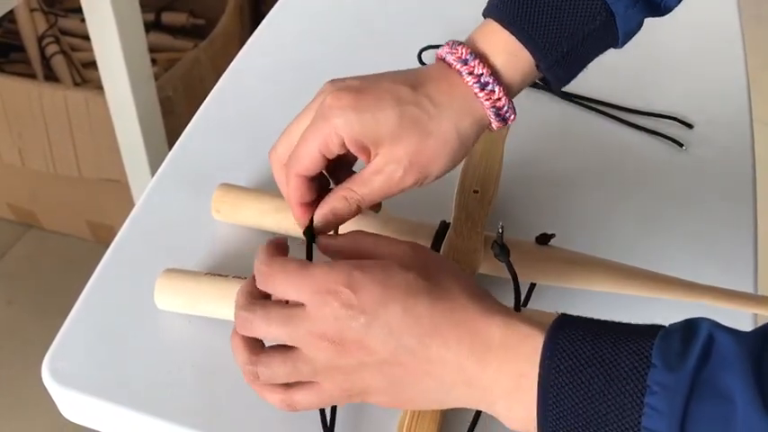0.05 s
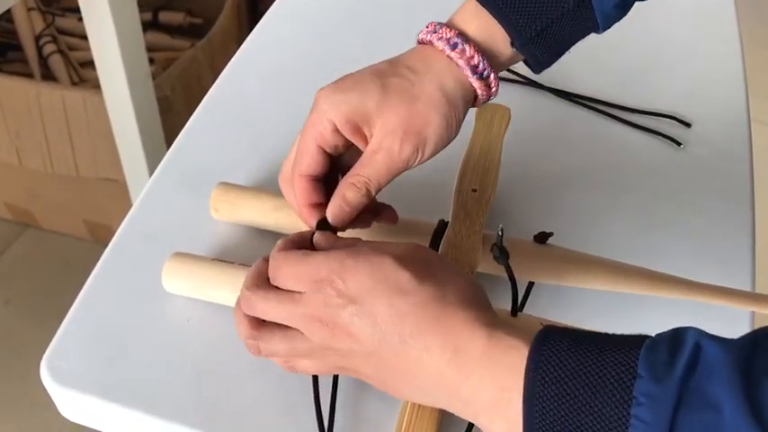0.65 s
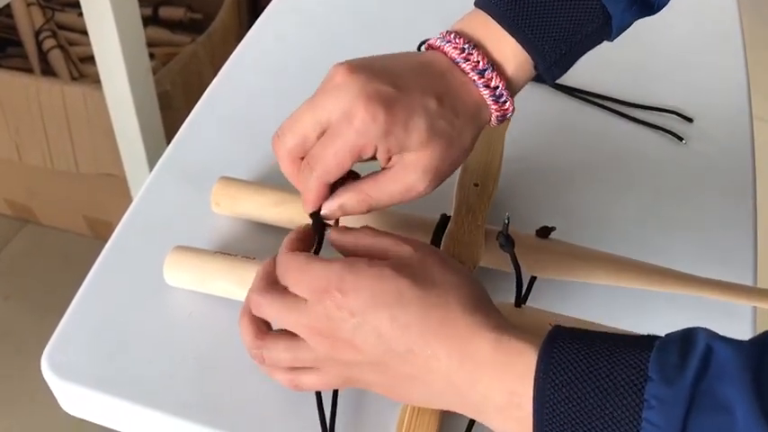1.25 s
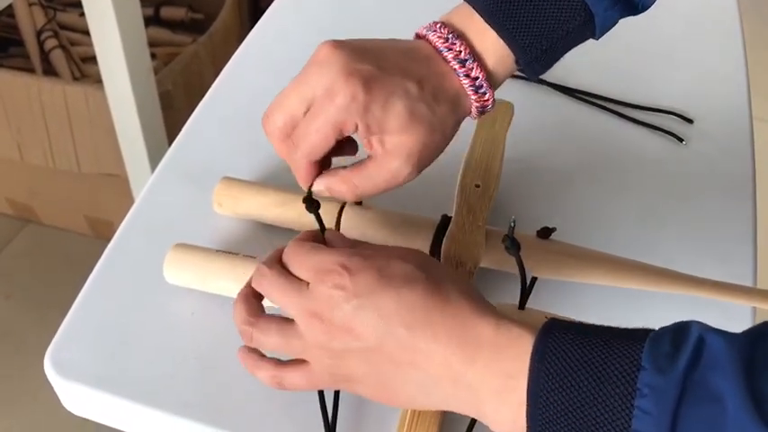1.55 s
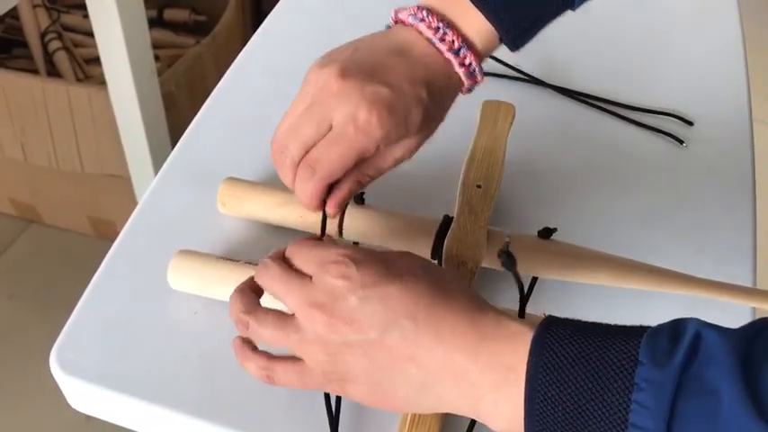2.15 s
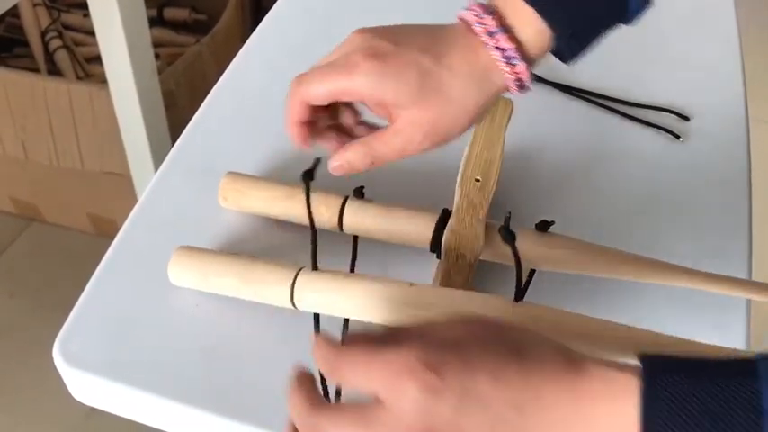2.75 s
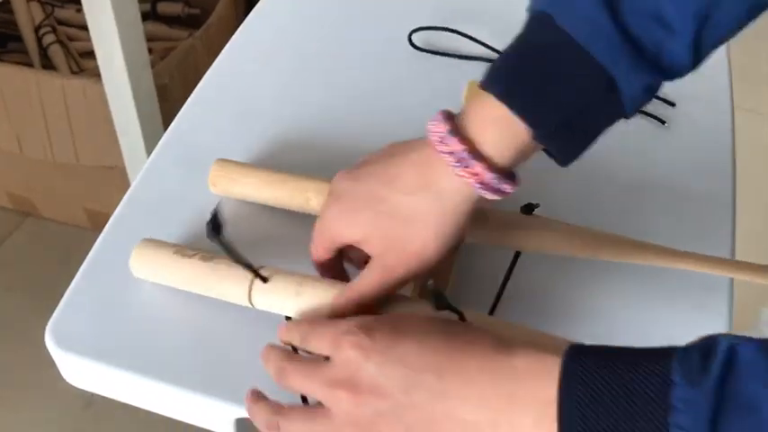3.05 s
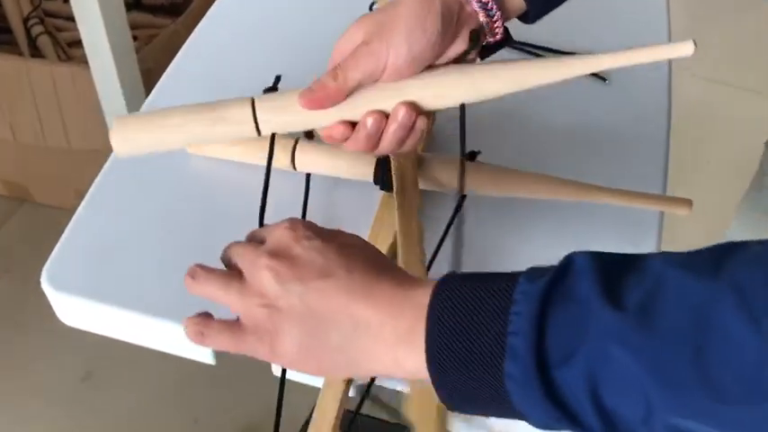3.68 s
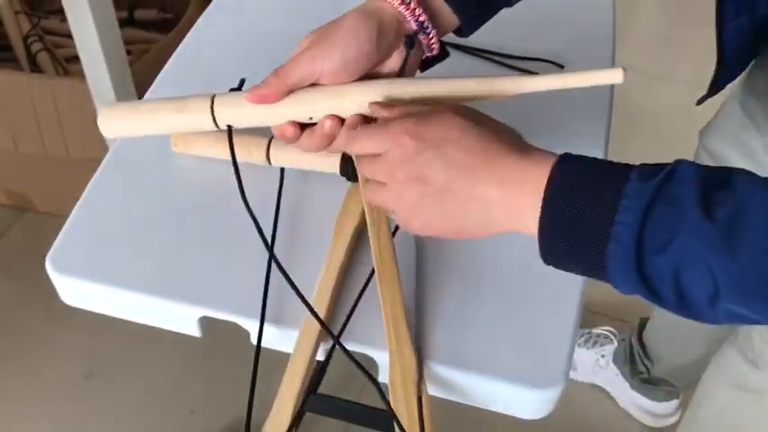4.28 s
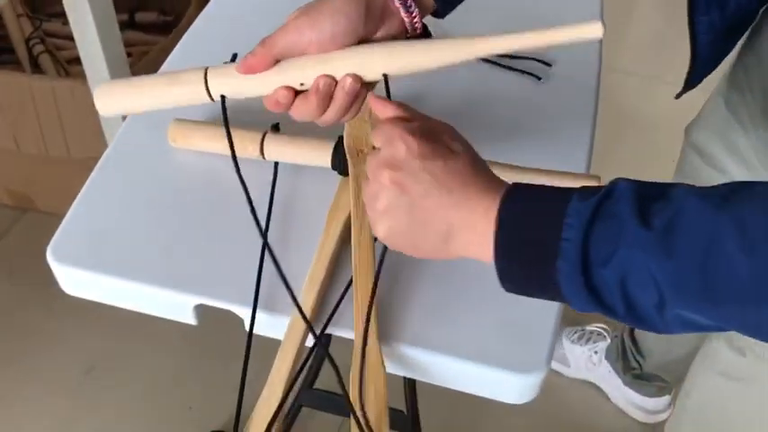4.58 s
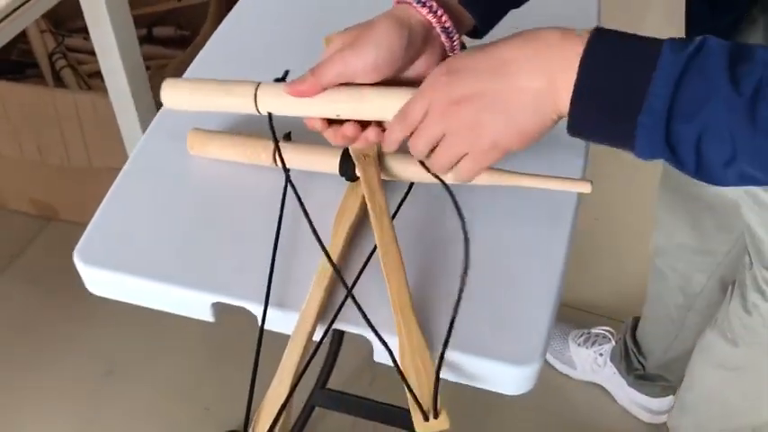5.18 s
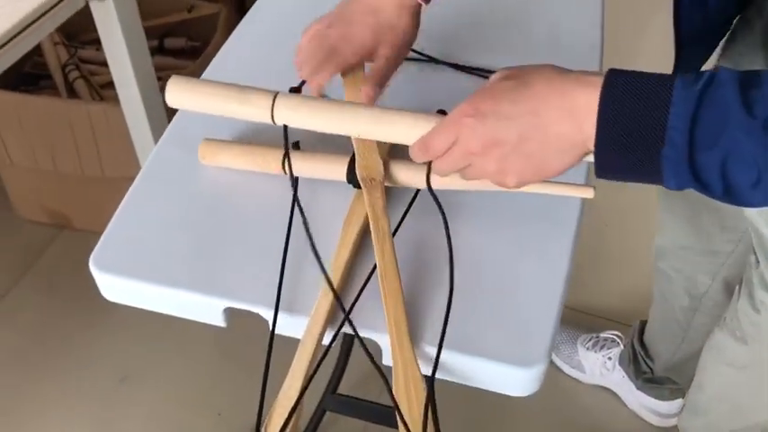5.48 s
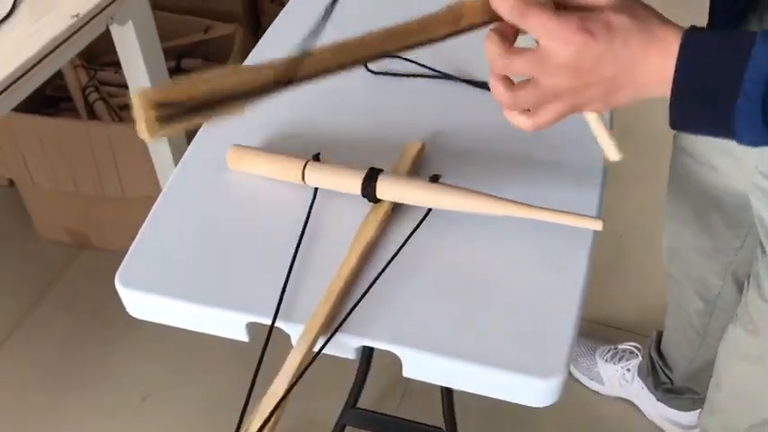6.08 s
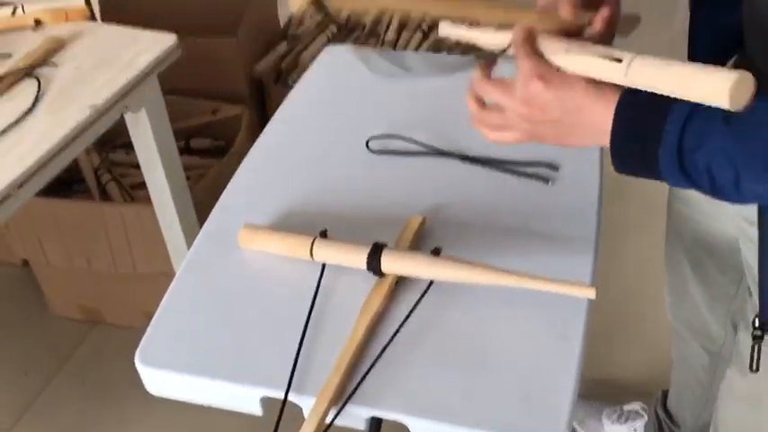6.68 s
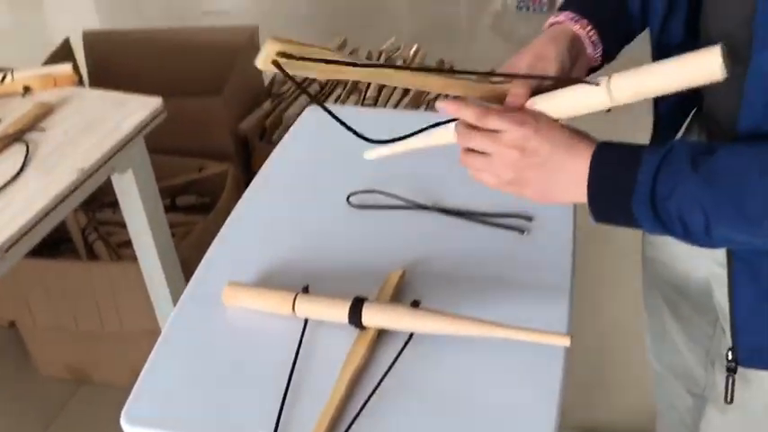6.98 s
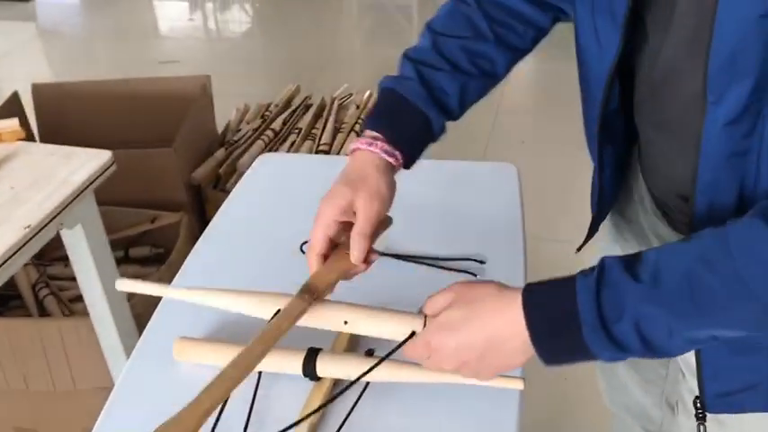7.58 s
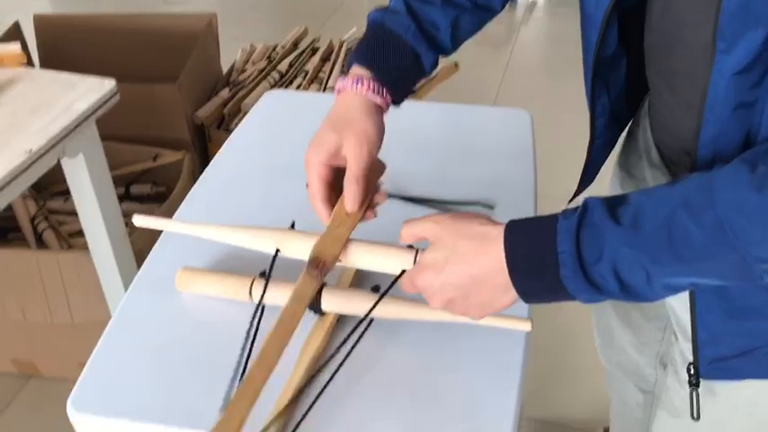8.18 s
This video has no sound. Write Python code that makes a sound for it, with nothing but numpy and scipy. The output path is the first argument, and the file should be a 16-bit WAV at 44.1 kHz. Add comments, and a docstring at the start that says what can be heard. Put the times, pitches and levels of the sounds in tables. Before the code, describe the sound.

Close by, hands and wooden pieces bump on a hollow plastic tabletop, twice quite hard. Sleeves rustle and wood slides, then the pieces clack and a cord is drawn through a hole with a fading rasp. Two sharp wooden clacks stand out, followed by light cord ticks, scuffs and one final clack. Distant engines drone softly beneath the air noise of a slightly echoing workshop.

```python
"""The wooden spindle and stave of a bow drill, handled over a hollow plastic table in a workshop.
Wood and hands thud on the tabletop, hardest at 1.8 and 2.7 s; fingers scuff, sleeves brush, parts drag.
The parts clack together at 3.8 s, then a cord rasps through a hole in the wood from 4 to 5 s.
Loud clacks follow at 5.3 and 5.8 s, the cord ticks on the spindle, and a last clack comes at 8.3 s.
Throughout, distant engines drone under the room's air noise."""
import sys
import numpy as np
from scipy import signal
from scipy.fft import rfft, irfft, next_fast_len
from scipy.io import wavfile
from scipy.ndimage import uniform_filter1d

SR = 44100
rng = np.random.default_rng(int(sys.argv[2]) if len(sys.argv) > 2 else 0)


def unload_audio(sound):
    """Save the sound as a 16-bit wav file, at the path given as the first command line argument."""
    columns = np.transpose(np.atleast_2d(sound))
    # keep every value between -1 and 1, then stretch to whole-number steps
    steps = np.round(np.clip(columns, -1, 1) * 32767)
    wavfile.write(sys.argv[1], SR, steps.astype(np.int16))


N = 367859

# modes of the whole table panel, its skin and the spindle: (frequency [Hz], level [dB], t60 [s])
PANEL_MODES = [(99, -41, 0.29), (129.9, -38.5, 0.32), (166, -34, 0.051), (216.7, -32.5, 0.11),
               (253.4, -34.5, 0.12), (269, -27.5, 0.061), (347, -38.5, 0.19)]
TOP_MODES = [(307, -36, 0.15), (345, -30, 0.13), (392, -36, 0.09), (460, -44, 0.08), (617, -50, 0.3),
             (745, -31, 0.045), (835, -33, 0.04), (1034, -30, 0.04), (1158, -36, 0.06), (1240, -32, 0.054),
             (1600, -42, 0.029)]
SPINDLE_MODES = [(1050, -27, 0.035), (1160, -22, 0.07), (1938, -27, 0.04), (1986, -17, 0.06),
                 (2210, -28, 0.025), (2860, -13.5, 0.028), (2930, -19, 0.018), (3090, -13.5, 0.022),
                 (3240, -23, 0.025), (3890, -29, 0.012), (4330, -22, 0.007), (5320, -19, 0.0067),
                 (5950, -21, 0.009), (6215, -9.5, 0.012), (6430, -25, 0.012), (7300, -19, 0.009),
                 (8720, -21, 0.008), (9700, -27, 0.011), (11550, -27, .011), (12800, -40, .012)]
# short, overlapping modes of the tabletop: (frequency [Hz], level [dB])
TOP_WASH_SPECTRUM = [(80, 6), (200, 0), (350, 4), (570, -7.5), (800, -2.5), (1250, -5.5), (2000, -8.5),
                     (3200, -12.5), (6000, -22), (14000, -69)]


def amp(db):
    """Decibels to gain."""
    return 10 ** (np.asarray(db) / 20)


def unit_rms(x):
    """Scale to rms 1."""
    return x / np.sqrt(np.mean(x ** 2) + 1e-20)


def at_hz(points, hz):
    """Interpolate a table on a log-frequency axis."""
    table_hz, value = np.transpose(points)
    return np.interp(np.log(hz + 1), np.log(table_hz + 1), value)


def curve(rows, column=1):
    """One column of a timed table at every sample."""
    rows = np.array(rows)
    return np.interp(np.arange(N) / SR, rows[:, 0], rows[:, column])


def add(mix, start_s, sound):
    """Mix a sound in at start_s."""
    part = mix[round(start_s * SR):][:len(sound)]
    part += sound[:len(part)]


def butter(x, hz, kind, order=2):
    """Butterworth filter."""
    return signal.sosfilt(signal.butter(order, hz, kind, fs=SR, output="sos"), x)


def colour(x, spectrum):
    """Filter by a dB spectrum; output at rms 1."""
    size = next_fast_len(len(x))
    gain = amp(at_hz(spectrum, np.fft.rfftfreq(size, 1 / SR)))
    return unit_rms(irfft(rfft(x, size) * gain, size)[:len(x)])


def ring(modes, rise_s):
    """Impulse response of damped modes; neighbours swing in opposite senses."""
    t = np.arange(SR // 2) / SR
    swings = sum((-1) ** k * amp(db - 60 * t / t60_s) * np.sin(2 * np.pi * hz * t)
                 for k, (hz, db, t60_s) in enumerate(modes))
    return swings * (1 - np.exp(-t / rise_s))


def wash(spectrum, db, t60_s, rise_s):
    """Many overlapping modes: a short burst of coloured noise."""
    t = np.arange(SR // 2) / SR
    noise = colour(rng.standard_normal(len(t)), spectrum)
    return noise * amp(db - 60 * t / t60_s) * (1 - np.exp(-t / rise_s))


def knocks():
    """Each blow rings both the table and the hand-held wood; returns (thuds, clacks)."""
    # wood and hands on the table: (time [s], contact cutoff [Hz], top [dB], slap [dB], panel [dB])
    thud_hits = [(0.095, 554, -23.5, -27, -35), (0.303, 494, -24, -38, -45), (0.331, 516, -29, -38, -40),
                 (0.4972, 1150, -21.5, -8.5, -17), (0.519, 1000, -25, -18, -16),
                 (1.0042, 1080, -21, -13, -21), (1.7866, 2390, -10, 3.5, -18), (1.8184, 1107, -40, -8, -14),
                 (2.564, 451, -27.5, -28, -23), (2.7244, 1450, -8.5, 5.5, -5), (2.767, 1200, -17, 1.5, -6),
                 (2.804, 1000, -21, -6, -13), (3.105, 800, -26.5, -12, -19), (3.253, 970, -28, -21, -15.5),
                 (3.669, 615, -27, -31, -14), (3.985, 1223, -42, -18, -26), (5.682, 620, -16.5, -12, -31)]
    # wood on wood: (time [s], contact cutoff [Hz], top [dB], slap [dB], panel [dB], stave [dB],
    # spindle [dB], grip cutoff [Hz], dry crack re ring [dB])
    clack_hits = [(3.847, 2500, -18, -11, -22, -24.5, -40, 200, 5),
                  (3.865, 2500, -39, -18, -22, -22, -43, 1500, 3),
                  (3.944, 2200, -21, -22, -12, -25.5, -37, 200, 6),
                  (5.2593, 8950, -13, 1, -3, -5.5, -25, 80, 2),
                  (5.2651, 1600, -9, -12, -9, -3.5, -38, 900, 2),
                  (5.3040, 5900, -17, -12, -10, -7, -26, 2400, -1),
                  (5.8353, 13000, -10, -1, 1, -20, -5.5, 710, 1),
                  (5.83725, 10000, -19, -14, -24, -17, -9.5, 710, -1),
                  (5.84135, 5000, -24, -17, -24, -20, -18, 1500, 0),
                  (7.645, 2700, -33.5, -19, -45, -19, -48, 2900, -8),
                  (8.3304, 13390, -26, -14.5, -28, -6, -16, 2900, 4)]
    # modes of the struck patch of tabletop and of the stave: (frequency [Hz], level [dB], t60 [s])
    slap_modes = [(800, -20.5, 0.014), (1100, -21.5, 0.009)]
    stave_modes = [(215.6, -24, 0.2), (262, -16, 0.04), (926, -38, 0.1), (1378, -23, 0.09),
                   (1440, -26, 0.05), (1530, -22, 0.0098), (1671, -36, 0.09), (2160, -34, 0.025),
                   (2400, -42, 0.053), (2850, -19, 0.045), (3845, -39, 0.045), (4300, -30, 0.0078),
                   (5000, -26.5, 0.02), (5930, -36, 0.0098), (7860, -38, 0.0096)]
    # bending waves in the tabletop, the direct one first, then returns from its edges: (travel time at 1 kHz
    # [s], level [dB], treble limit [Hz])
    bending_arrivals = [(0.0035, -24, 1100), (0.0105, -23, 430), (0.019, -28, 380)]
    # short, overlapping modes of the wood: (frequency [Hz], level [dB])
    crack_spectrum = [(300, -83), (1000, 10), (3000, -0.5), (5000, -4), (7000, -11.5), (9000, -18),
                      (10500, -31), (14000, -23)]

    slap = sum(ring([mode], rise_s=0.0005) for mode in slap_modes)
    top = ring(TOP_MODES, rise_s=0.003) + sum(bending_wave(*row) for row in bending_arrivals)
    panel = ring(PANEL_MODES, rise_s=0.0075)
    stave = ring(stave_modes, rise_s=0.00072)
    spindle = ring(SPINDLE_MODES, rise_s=0.00038)

    def blow(contact_hz, top_db, slap_db, panel_db, stave_db, spindle_db, grip_hz, crack_db=0):
        """The grip mutes the wood's lows; a softer contact excites less treble."""
        top_wash = wash(TOP_WASH_SPECTRUM, db=-26, t60_s=0.12, rise_s=0.003)
        stave_crack = wash(crack_spectrum, db=crack_db - 20.5, t60_s=0.03, rise_s=0.0001)
        spindle_crack = wash(crack_spectrum, db=crack_db - 8.5, t60_s=0.018, rise_s=0.00019)
        table = amp(slap_db) * slap + amp(panel_db) * panel + amp(top_db) * (top + top_wash)
        wood = amp(stave_db) * (stave + stave_crack) + amp(spindle_db) * (spindle + spindle_crack)
        return butter(table + butter(wood, grip_hz, "high"), contact_hz, "low")

    lean_db_per_s, lean_delay_s = 115, 0.03  # resting hands damp the table
    leaning = amp(-lean_db_per_s * np.maximum(np.arange(len(top)) / SR - lean_delay_s, 0))
    thuds, clacks = np.zeros((2, N))
    for start_s, contact_hz, top_db, slap_db, panel_db in thud_hits:
        thud = blow(contact_hz, top_db, slap_db, panel_db,
                    stave_db=top_db - 12, spindle_db=top_db - 18.5, grip_hz=1900)
        add(thuds, start_s, leaning * thud)
    for start_s, *contact in clack_hits:
        add(clacks, start_s, blow(*contact))
    return thuds, clacks


def bending_wave(delay_s, db, treble_hz, bass_hz=227):
    """A bending wave through the tabletop: treble travels fastest, so it arrives as a falling chirp."""
    hz = np.fft.rfftfreq(SR // 2, 1 / SR)
    lag_rad = 4 * np.pi * delay_s * np.sqrt(1000 * hz)
    band = hz ** 2 / (hz ** 2 + bass_hz ** 2) / (1 + (hz / treble_hz) ** 3)
    wave = irfft(band * np.exp(-1j * lag_rad), SR // 2)
    return amp(db) * wave / abs(wave).max()


def cord_pull():
    """The braid is jerked through the hole; as it slows it fades, dulls and its ribs pass more slowly."""
    # fibre rasp and full-speed fizz: (frequency [Hz], level [dB])
    fibre_spectrum = [(500, -4.5), (1500, -2.5), (2600, 4), (4000, -2), (6200, -5), (8400, -19),
                      (10000, -19), (12500, -26), (14000, -37)]
    fizz_spectrum = [(2500, -25), (5000, -21), (8300, 5), (9500, -6), (12500, -5), (14000, 1)]
    start_s, rise_s, hold_s, length_s, stop_s = 3.99, 0.085, 0.16, 1.02, 0.22
    fibre_db_per_s, fizz_db_per_s, rib_db_per_s = -22.5, -50, -22
    rib_hz, rib_sag_hz_per_s, rib_width_hz = 2640, 1400, 210

    t = np.arange(N) / SR - start_s
    slowing_s = np.clip(t - hold_s, 0, length_s)
    moving = np.clip(t / rise_s, 0, 1) * np.clip((length_s - t) / stop_s, 0, 1)
    strands = grainy(slips(per_s=16000, spread_db=1.1), depth_db=1.6)
    fibres = amp(-50.5 + fibre_db_per_s * slowing_s) * colour(strands, fibre_spectrum)
    fizz = amp(-59.5 + fizz_db_per_s * slowing_s) * colour(strands, fizz_spectrum)
    flutter = butter(rng.standard_normal(N), rib_width_hz, "low")
    rib_phase = 2 * np.pi * np.cumsum(rib_hz - rib_sag_hz_per_s * slowing_s) / SR
    ribs = amp(-55 + rib_db_per_s * slowing_s) * unit_rms(flutter * np.sin(rib_phase))
    return moving * (fibres + fizz + ribs)


def slips(per_s, spread_db):
    """Friction: a dense train of tiny slips of uneven size."""
    sizes = amp(spread_db * np.minimum(rng.exponential(1, N), 4)) * rng.standard_normal(N)
    return unit_rms(sizes * (rng.random(N) < per_s / SR))


def grainy(x, depth_db):
    """Grainy, fluttering texture: narrow bands swell and fade at random over about 40 ms."""
    bands = signal.stft(x, SR, nperseg=512)[2]
    field = uniform_filter1d(rng.standard_normal(bands.shape), size=4, axis=0)
    field = unit_rms(uniform_filter1d(field, size=7, axis=1))
    return unit_rms(signal.istft(bands * amp(depth_db * field), SR, nperseg=512)[1][:len(x)])


def scuffs():
    """Fingers, cord and wood slip on the spindle: a dry rasp plus the modes it wakes."""
    # slip runs: (time [s], length [s], level [dB], ring re rasp [dB])
    runs = [(1.344, 0.0085, -63, -20), (3.509, .018, -60, -10), (3.524, 0.0055, -50, -9),
            (3.551, 0.005, -53, -12), (3.553, 0.037, -57, -11), (3.584, 0.0035, -55, -2),
            (3.593, 0.0041, -51, -2), (3.605, 0.006, -51, -5), (3.61, 0.088, -70, 10),
            (3.672, 0.074, -61, -8), (3.755, 0.1, -72, 12), (3.846, 0.034, -60, 6), (3.91, .09, -78, 5),
            (4.449, 0.078, -59.5, 0), (5.258, 0.0042, -42, -10), (5.923, 0.017, -51, -16),
            (6.166, 0.011, -62.5, 11), (6.931, .0095, -62, -6), (7.72, 0.04, -70, 15),
            (7.774, 0.0078, -62, 12), (7.865, 0.044, -60, 12), (7.894, 0.053, -53, 9)]
    # dry rasp and drive into the wood: (frequency [Hz], level [dB])
    rasp_spectrum = [(1500, 3), (3500, 1), (6000, -14), (8000, -5), (10500, 2), (12500, 4), (14000, 6)]
    drive_spectrum = [(1000, -20), (2000, -16), (3000, -11), (4400, 13), (6200, -2.5), (7200, 5.5),
                      (8700, 3), (10000, 5), (12000, 6), (14000, 8)]

    grains = slips(per_s=8000, spread_db=1)
    rasp = colour(grains, rasp_spectrum)
    drive = colour(grains, drive_spectrum)
    wood = unit_rms(signal.oaconvolve(drive, ring(SPINDLE_MODES, rise_s=0.00035))[:N])
    out = np.zeros(N)
    for start_s, length_s, db, ring_db in runs:
        scuff = (rasp + amp(ring_db) * wood)[round(start_s * SR):][:round(length_s * SR)]
        add(out, start_s, amp(db) * unit_rms(scuff) * signal.windows.tukey(len(scuff), 0.7))
    return out


def cord_ticks():
    """The cord catches and slips on the tightly held spindle; only the highest modes answer."""
    # catches: (time [s], length [s], level [dB])
    catches = [(6.245, 0.0059, -53), (6.3054, 0.003, -51)]
    bright = butter(ring(SPINDLE_MODES, rise_s=0.00016), hz=6170, kind="high", order=5)
    out = np.zeros(N)
    for start_s, length_s, db in catches:
        size = round(length_s * SR)
        slip = rng.standard_normal(size) * np.linspace(0, 1, size)  # builds up, then lets go
        tick = signal.oaconvolve(slip, bright)
        add(out, start_s, amp(db) * tick * np.sqrt(size) / np.linalg.norm(tick))
    return out


def drags():
    """Wood and hands drag over the textured tabletop; the slips ring the table."""
    # drag strokes: (start [s], length [s], level [dB])
    strokes = [(2.9, 0.68, -55.5), (3.62, 0.36, -53.5), (3.8, 0.51, -53.5), (4.42, 0.15, -56),
               (8.1, 0.17, -68)]
    table = ring(TOP_MODES, rise_s=0.0028) + amp(-2) * ring(PANEL_MODES, rise_s=0.0026)
    table += wash(TOP_WASH_SPECTRUM, db=-26, t60_s=0.087, rise_s=0.0032)
    rubbing = signal.oaconvolve(slips(per_s=1300, spread_db=0.5), table)[:N]
    return unit_rms(rubbing) * stroke_gain(strokes)


def sleeves():
    """Cloth and skin brush in strokes of friction."""
    # brush strokes: (start [s], length [s], level [dB])
    strokes = [(1.43, 0.29, -68.5), (2.23, .1, -71), (2.44, 0.099, -70), (2.64, 0.35, -62.5),
               (2.95, 0.38, -63.5), (3.27, 0.89, -64.5), (4.88, 0.38, -63.5), (5.4, 0.31, -66),
               (6.28, 0.095, -66), (6.66, 0.19, -65.5), (6.85, 1, -74), (7.68, 0.34, -69)]
    # cloth friction: (frequency [Hz], level [dB])
    cloth_spectrum = [(500, 14), (2000, 11.5), (4000, 11), (6300, 6), (8500, 4), (10500, -3), (12000, 3.5),
                      (14000, -2)]
    grains = grainy(slips(per_s=8000, spread_db=1.4), depth_db=1.5)
    return colour(grains, cloth_spectrum) * stroke_gain(strokes)


def stroke_gain(strokes, skew=0.61):
    """One arch per rubbing stroke; with skew under 1 it speeds up faster than it slows."""
    gain = np.zeros(N)
    for start_s, length_s, db in strokes:
        progress = np.linspace(0, 1, round(length_s * SR))
        add(gain, start_s, amp(db) * np.sin(np.pi * progress ** skew))
    return gain


def engine(firing_hz, orders):
    """Only a far engine's lowest shaft orders pass the walls; their levels waver."""
    turns = np.cumsum(firing_hz) / SR / 3  # three firings per turn
    out = np.zeros(N)
    for order, db in orders:
        waver_db = np.interp(np.arange(N), np.linspace(0, N, 60), rng.standard_normal(60))
        out += amp(db + waver_db) * np.sin(2 * np.pi * (order * turns + rng.random()))
    return out


def idling_engine():
    """A far engine idles and is throttled up, louder the faster it runs."""
    # engine speed: (time [s], firing rate [Hz])
    throttle = [(0, 52.97), (.7, 45.1), (2.5, 45.1), (3.4, 49.85), (4.1, 53.62), (5, 53.02), (6.4, 45.35),
                (7.7, 45), (8.34, 48.5)]
    # shaft harmonics: (order, level [dB])
    orders = [(2, -7.5), (3, -2.5), (4, -4.5), (6, -15.5)]
    idle_hz, idle_db, load_db_per_hz = 45.2, -53, 1.12
    firing_hz = curve(throttle)
    return amp(idle_db + load_db_per_hz * (firing_hz - idle_hz)) * engine(firing_hz, orders)


def passing_engines():
    """Two more engines speed up as they go by, swelling and fading."""
    # one list per engine: (time [s], firing rate [Hz], level [dB])
    passes = [
        [(0, 65, -54.5), (1.6, 67, -52), (1.95, 69.7, -46), (2.3, 72.2, -52.5), (2.7, 79.65, -59.5),
         (3.1, 83.2, -53), (3.8, 88.4, -56.5)],
        [(5.4, 51.4, -50), (5.75, 54.15, -51.5), (6.3, 57.87, -51.5), (6.8, 63.5, -56), (7.05, 67, -45.5),
         (7.55, 67.2, -43), (7.8, 67.9, -49.5), (8.34, 63.9, -62)],
    ]
    # shaft harmonics: (order, level [dB])
    orders = [(2, -20), (3, 2.5), (6, -22)]
    t = np.arange(N) / SR
    out = np.zeros(N)
    for rows in passes:
        audible = (t >= rows[0][0]) & (t <= rows[-1][0])
        gain = amp(curve(rows, column=2)) * uniform_filter1d(audible.astype(float), size=6000)
        out += gain * engine(curve(rows), orders)
    return out


def room_noise():
    """Slowly growing air noise over a steady rumble."""
    # air and rumble: (frequency [Hz], level [dB])
    air_spectrum = [(65, -47), (110, 5), (160, -6.5), (250, -3), (370, -10.5), (600, -12.5), (820, -12),
                    (1000, -9.5), (1400, -12), (2120, -19), (3500, -24.5), (4060, -22.5), (5000, -30.5),
                    (6500, -32.5), (8000, -37), (14000, -39)]
    rumble_spectrum = [(15, -45), (25, -32), (33, 4.5), (39, -13), (48, -12), (64, -0.5), (80, -1.5),
                       (110, -11.5), (150, -13.5), (300, -81)]
    air_db, rise_db_per_s, rumble_db = -58.5, 0.42, -57
    air = amp(air_db + rise_db_per_s * np.arange(N) / SR) * colour(rng.standard_normal(N), air_spectrum)
    return air + amp(rumble_db) * colour(rng.standard_normal(N), rumble_spectrum)


def workshop(x, tail_db, build_s=0.01):
    """Add early echoes and a diffuse tail whose bands decay at their own rates."""
    # room decay: (frequency [Hz], t60 [s])
    decay_times = [(100, .7), (250, .6), (600, .42), (1300, .48), (2000, .47), (3000, .49), (6300, .43),
                   (9000, .35), (13000, .25)]
    # tail colour: (frequency [Hz], level [dB])
    tail_spectrum = [(100, 5), (250, 3.5), (450, 0.5), (750, 0.5), (1200, -0.5), (2000, -2), (2500, -1),
                     (3000, -3), (3800, -3), (4800, -5), (6300, -4.5), (9000, -2), (14000, 0)]
    # nearby surfaces: (delay [s], gain)
    echoes = [(.0047, 0.07), (.0068, 0.13), (0.012, 0.12), (0.017, .1), (.021, 0.039)]

    hz, t, bands = signal.stft(colour(rng.standard_normal(SR), tail_spectrum), SR, nperseg=256)
    decay = amp(-60 * t / at_hz(decay_times, hz)[:, None])
    tail = signal.istft(bands * decay, SR, nperseg=256)[1]
    tail *= 1 - np.exp(-(np.arange(len(tail)) / SR / build_s) ** 2)
    response = amp(tail_db) * tail / np.linalg.norm(tail)
    for delay_s, gain in echoes:
        response[round(delay_s * SR)] += gain
    return x + signal.oaconvolve(x, response)[:N]


def scene():
    """Handling sounds in the room, the thuds driest, over the background; mono."""
    thuds, clacks = knocks()
    handling = clacks + scuffs() + cord_ticks() + cord_pull() + sleeves() + drags()
    foreground = workshop(thuds, tail_db=-16) + workshop(handling, tail_db=-10.5)
    return (foreground + room_noise() + idling_engine() + passing_engines())[None]


def record(dry):
    """Steep low-pass at 14.2 kHz."""
    lowpass = signal.firwin(511, 14200, window=("kaiser", 9), fs=SR)
    return signal.oaconvolve(dry, lowpass[None], "same")


dry = scene()
out = record(dry)
unload_audio(out)
```